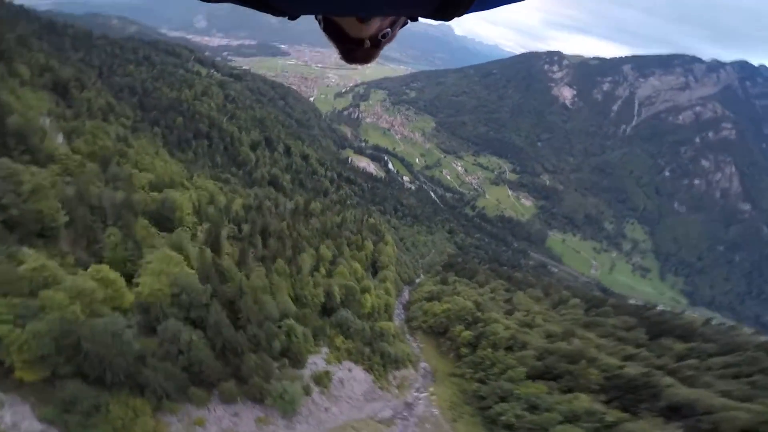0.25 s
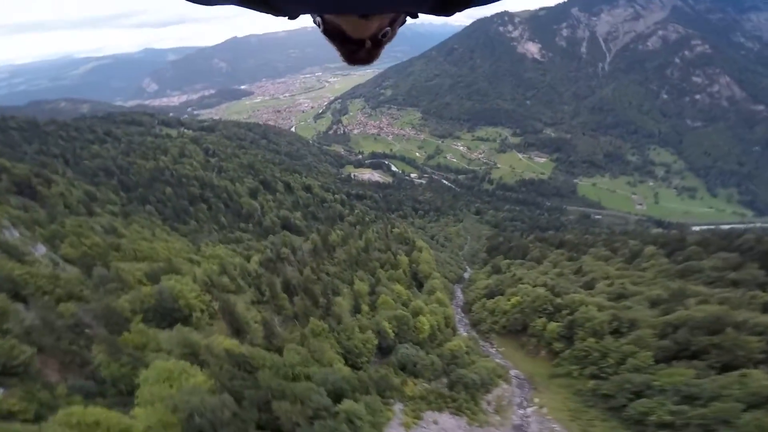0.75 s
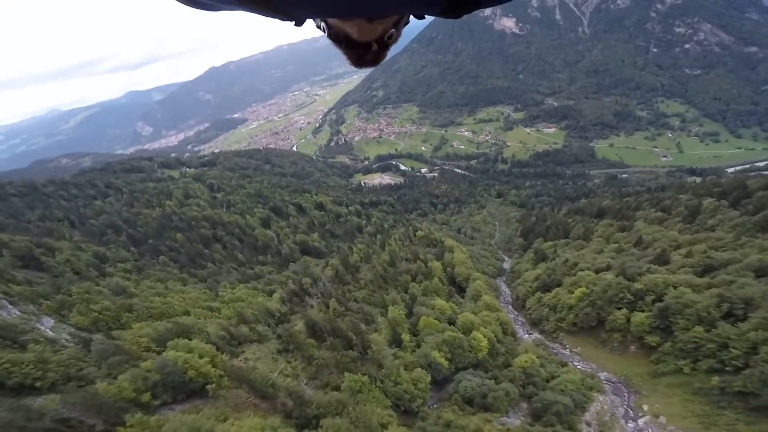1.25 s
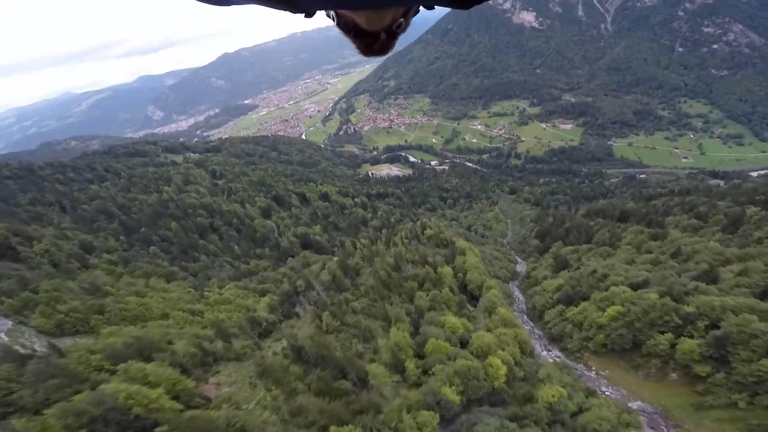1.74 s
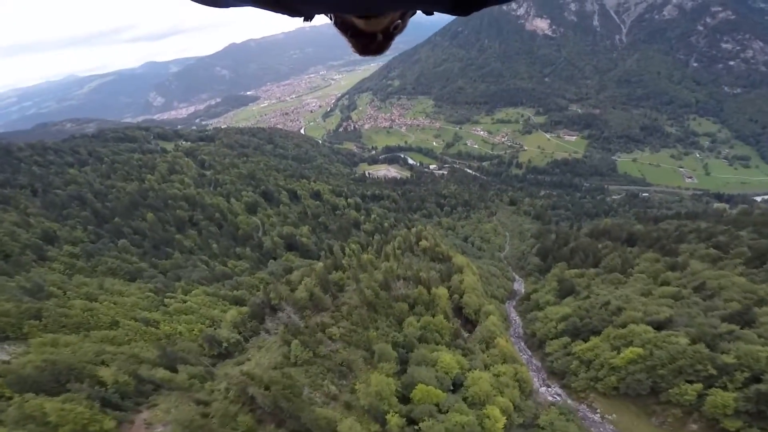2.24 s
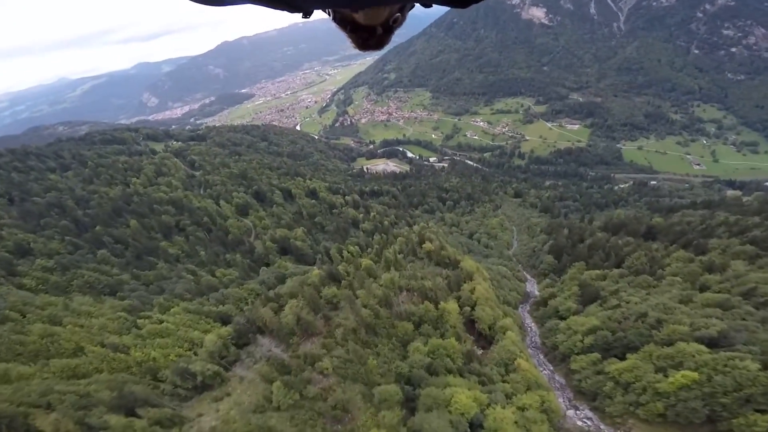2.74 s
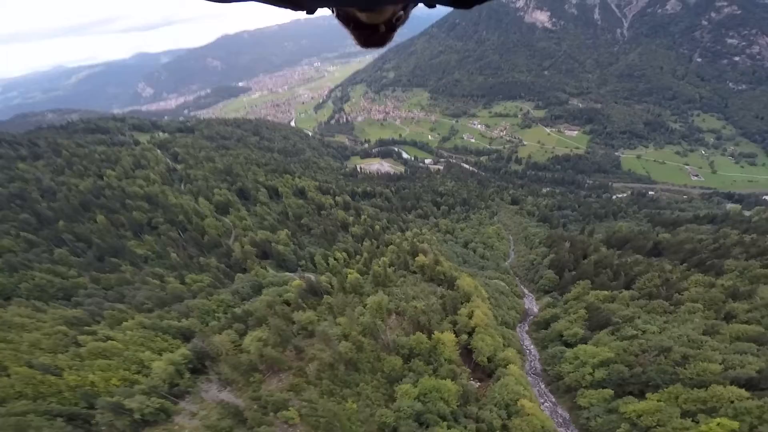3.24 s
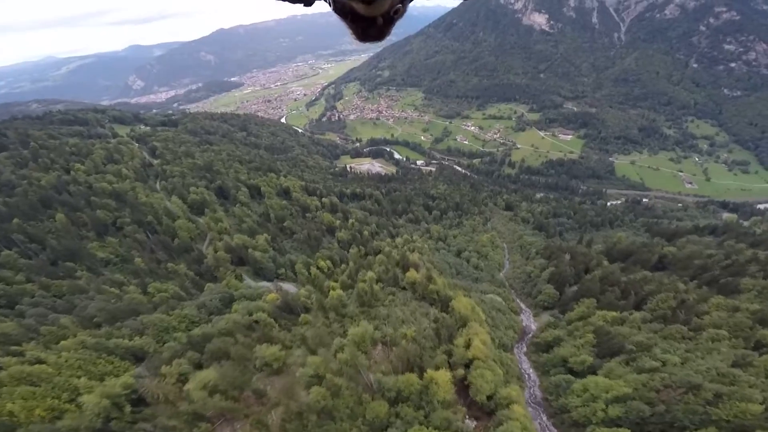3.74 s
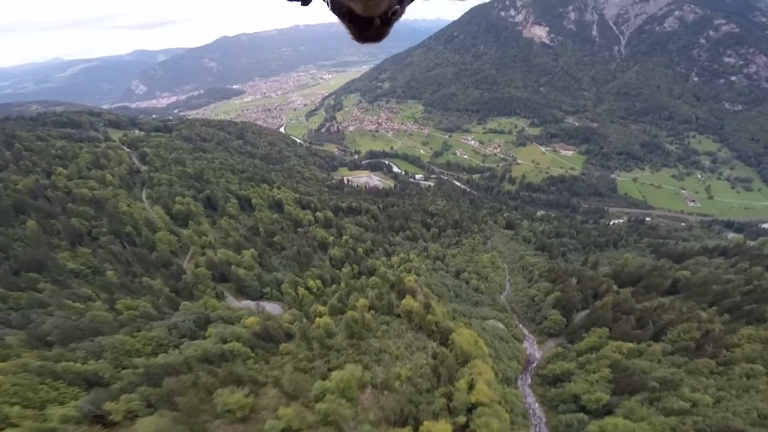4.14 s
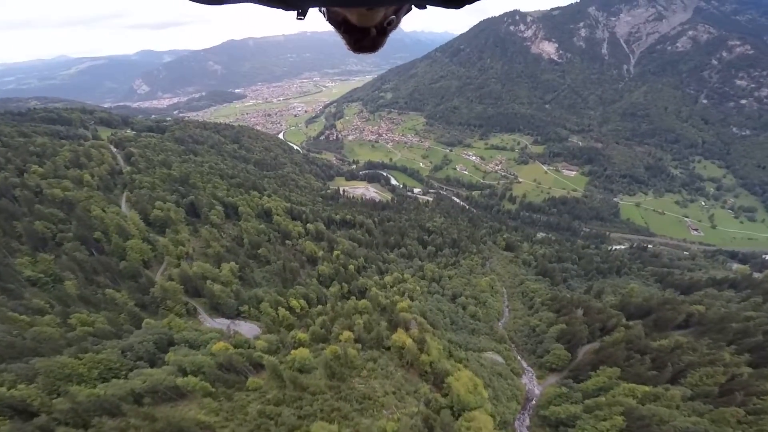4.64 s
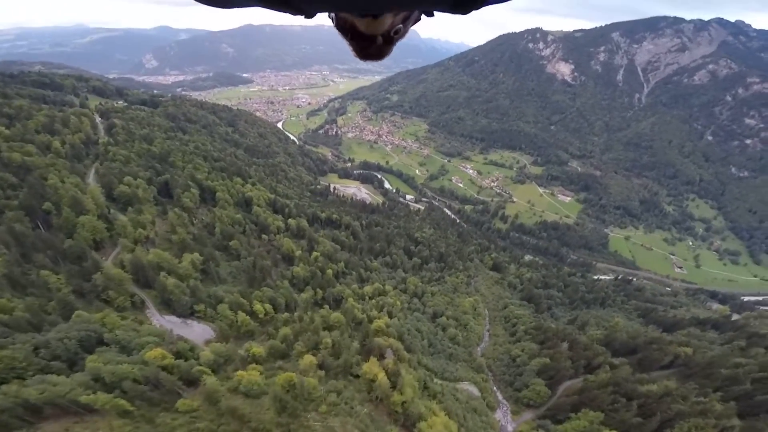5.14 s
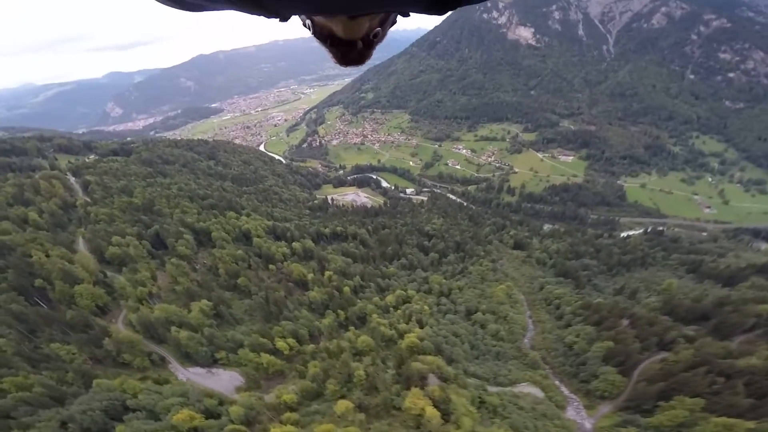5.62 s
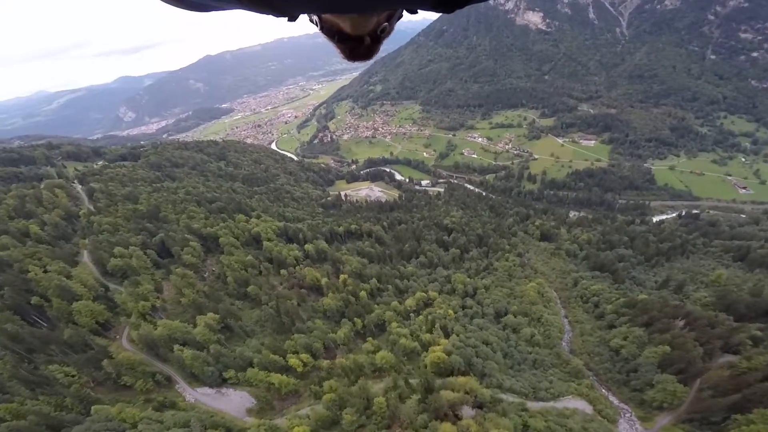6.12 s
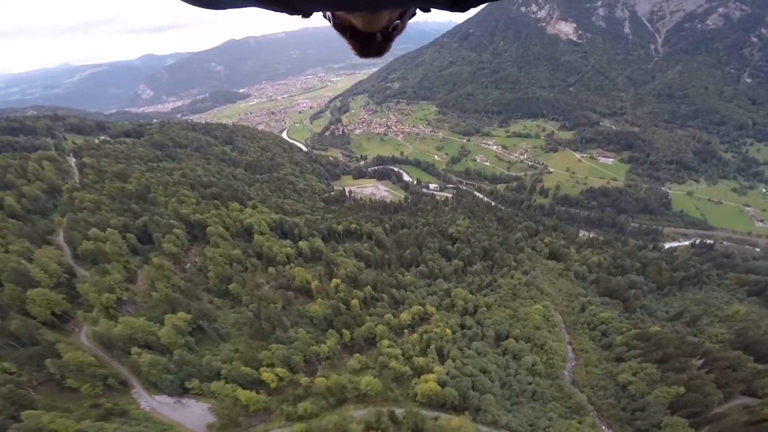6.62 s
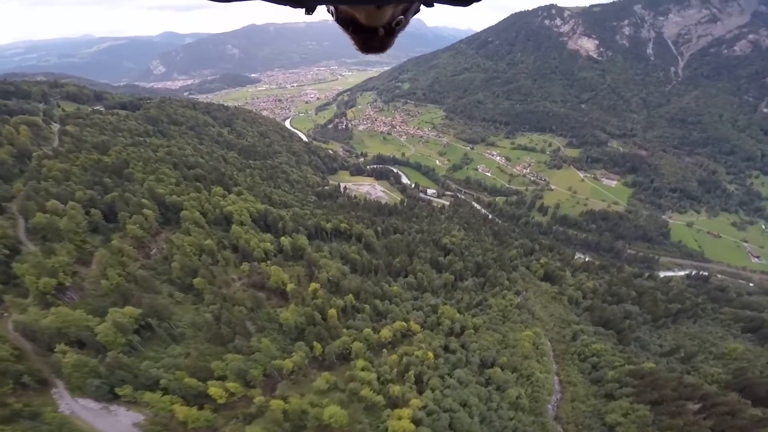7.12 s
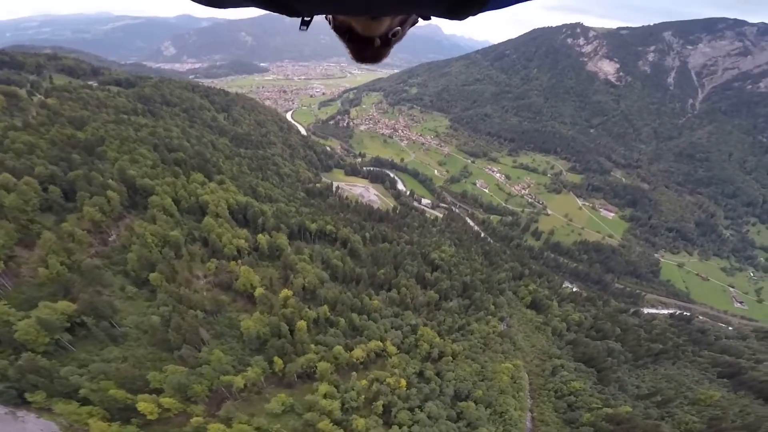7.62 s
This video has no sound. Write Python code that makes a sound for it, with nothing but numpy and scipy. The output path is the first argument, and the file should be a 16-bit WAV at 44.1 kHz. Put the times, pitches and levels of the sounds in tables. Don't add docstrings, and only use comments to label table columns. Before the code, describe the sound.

Wind noise fills the whole eight seconds, already loud at the first instant, as air tears past a small microphone on a helmet in fast flight. The foundation is deep, ragged buffeting, a fluttering low rumble pushing the microphone bodily, with a rough, wavering low drone of vortices from the housing edge. Over it runs a coarse airy rush and a thinner bright hiss that puffs and crackles. The first 0.3 seconds are gusty and spitting; around 1 second the edge rumble thickens. From 2 to 4.8 seconds the flow wavers moderately, dipping near 3, with scattered dull slaps and dry ticks. A stronger gust hits at about 5 to 5.3 with sharper slaps. Fine crackle flares near 6, the wind slackens around 6.5, then strengthens toward the end, cut off still blowing. Everything is mono, very close, dry and compressed, its extreme treble dulled.

```python
import sys
import numpy as np
from scipy import signal
from scipy.fft import rfft, irfft, next_fast_len
from scipy.io import wavfile
from scipy.ndimage import uniform_filter1d

SR = 44100
rng = np.random.default_rng(int(sys.argv[2]) if len(sys.argv) > 2 else 0)


def store_pcm(level_fs):
    pcm = np.round(np.clip(level_fs, -1, 1) * 32767).astype(np.int16)
    wavfile.write(sys.argv[1], SR, np.atleast_2d(pcm).T)


def convert_level_to_amplitude(level_db):
    exponent = np.asarray(level_db, float) / 20
    return 10 ** exponent


N = 347067

# frequency_hz, density_db (per Hz)
BUFFET_SPECTRUM = [(8.8, -45.5), (15, -12.5), (75, 1), (119, 0.5), (150, -3.5), (200, -24.5), (330, -120)]
# frequency_hz, density_db (per Hz)
SHEDDING_SPECTRUM = [(82, -28), (140, -2), (211, -2.5), (400, -19), (520, -45.5), (880, -120)]
# frequency_hz, density_db (per Hz)
RUSH_SPECTRUM = [(180, -22.5), (300, 1.5), (543, -5), (1620, -16.5), (3110, -33), (3600, -37), (4680, -40),
                 (7920, -120)]
# frequency_hz, density_db (per Hz)
PORT_SPECTRUM = [(1820, -23.5), (3100, -41.5), (3580, -9), (4700, 1), (5230, 1.5), (6860, -6.5),
                 (9600, -20.5), (11100, -27), (14400, -55), (22000, -120)]
# time_s, rate_hz
WAKE_RATE = [(0, 77.8), (.3, 82.13), (.75, 121), (1.2, 76.5), (1.5, 99.8), (2.3, 80), (2.85, 120.4),
             (3.2, 87.75), (3.9, 79.9), (4.2, 105), (4.7, 85), (5.0, 110.8), (5.4, 79.7), (5.7, 122.3),
             (5.9, 86.2), (6.9, 92.06), (7.1, 122.6), (7.87, 124)]
# time_s, level_db (re mean)
GUST = [(0, 3), (.26, 1), (.3, 1.8), (.55, 0.3), (.8, 0.5), (2.0, -1), (2.45, 0.6), (3.0, -1.5), (3.4, 0.9),
        (4.2, 0.5), (4.9, 1.2), (5.2, 5), (5.6, -0.7), (6.1, -1.4), (6.45, -3), (6.7, 0.1), (7.25, -0.7),
        (7.87, 3)]
# time_s, level_db (re mean)
YAW = [(0, -4), (.25, 1.5), (.6, -2.7), (1.0, 7), (1.25, 0.1), (1.4, 4), (2.0, 0.2), (2.7, 1.1), (2.95, -6),
       (3.5, -0.5), (4.8, -3), (5.2, 3.5), (5.6, 4), (6.1, 3), (6.45, -2.5), (6.85, 1), (7.2, -6),
       (7.87, 3.5)]
# centre_s, strength_db
FLURRIES = [(.04, 5.5), (.13, 1), (.22, 4.5), (.45, 2.5), (.72, 2.1), (.95, 2.7), (1.27, 0), (1.5, 0.2),
            (2.13, 3), (2.42, 1), (2.72, 2.5), (2.92, 4), (3.2, 2), (3.43, 2), (3.68, 0.5), (3.86, 2),
            (4.15, 1.5), (4.5, 1), (4.78, 1.7), (5.1, 1.5), (5.45, 0.5), (5.65, 3.5), (5.84, 3.5),
            (6.1, 4.5), (6.33, 3.5), (6.7, 0), (6.87, -2), (7.1, -0.2), (7.4, -0.5), (7.72, 0)]
# start_s, level_db, treble_db (re level)
SPITS = [(0.026, -22, -15), (0.0832, -23, -14), (0.1725, -18, -14), (0.196, -15, -14), (0.261, -15, -15),
         (1.0174, -18.5, -14.5), (1.2316, -19.5, -12), (1.2935, -16.5, -14), (2.1306, -20, -13),
         (2.6988, -18.5, -14), (2.7521, -24, -13), (2.805, -21.5, -14), (2.8838, -24, -14),
         (3.2417, -25, -14), (3.4067, -22, -14), (3.6023, -20, -14), (3.6897, -20.5, -14),
         (3.9015, -21, -15), (4.13, -22, -14), (5.089, -15, -14), (5.238, -16, -16), (5.8251, -20, -14),
         (5.8384, -18.5, -14), (5.9634, -23.5, -13), (6.102, -15.5, -15), (6.6598, -17.5, -13.5),
         (6.737, -17, -13), (6.8194, -22.5, -14), (6.8633, -21.5, -14), (6.9064, -24, -14)]
# start_s, level_db, treble_db (re level)
SLAPS = [(0.097, -10, -17), (0.13, -16, -15), (0.166, -5.5, -20), (0.256, -5, -21), (0.346, -5, -24),
         (0.86, -3, -15), (1.409, -23, -22), (2.037, -24, -19), (2.425, -6, -8), (2.466, -5, -22),
         (2.943, -9, -20), (3.418, -9, -20), (3.663, -15, -16), (3.881, -6, -16), (3.953, -6, -21),
         (4.519, -7, -17), (4.726, -3.5, -15), (4.766, -10, -16), (4.937, -23, -22), (5.028, -2, -25),
         (5.177, -4, -8), (5.26, -7, -6), (5.482, -12, -13), (6.075, -17, -14), (6.22, -7.5, -16),
         (6.939, -19, -18), (7.013, -20, -18), (7.082, -5, -24), (7.584, -6, -12), (7.721, -7, -19)]
# mean_db, spread_db, treble_db (re level), treble_spread_db
STRAY_SPITS = (-31, 1.6, -11.5, 2.5)
STRAY_SLAPS = (-21.5, 3.5, -12, 2.5)

HISS_DB = -38.5
RISE_S = 0.001222


def rms_one(x):
    return x / np.sqrt(np.mean(x ** 2) + 1e-20)


def in_time(rows):
    time_s, value = np.transpose(rows)
    return np.interp(np.arange(N) / SR, time_s, value)


def drift(rate_hz):
    r = np.exp(-2 * np.pi * rate_hz / SR)
    noise = rng.standard_normal(N + SR)
    return rms_one(signal.lfilter([1], [1, -2 * r, r * r], noise)[SR:])


def flicker(depth_db, rate_hz):
    return rms_one(convert_level_to_amplitude(depth_db * drift(rate_hz)))


def low_pass(x, order, cutoff_hz):
    return signal.sosfilt(signal.butter(order, cutoff_hz, fs=SR, output="sos"), x)


def sharper(x, share):
    return x - share * np.append(0, x[:-1])


def colour(x, spectrum):
    size = next_fast_len(N + SR // 2) // 2 * 2
    hz, db = np.transpose(spectrum)
    log_hz = np.log(np.maximum(np.fft.rfftfreq(size, 1 / SR), 1))
    gain_db = np.interp(log_hz, np.log(hz), np.maximum(db, -90))
    cepstrum = irfft(np.log(convert_level_to_amplitude(gain_db)), size)
    cepstrum[1:size // 2] *= 2
    cepstrum[size // 2 + 1:] = 0
    response = np.exp(rfft(cepstrum))
    peak = np.abs(irfft(response, size)).max()
    return irfft(rfft(x, size) * response, size)[:N] / peak


def turbulence(spectrum, shared_db, own_db, own_hz):
    lowest_hz, highest_hz = spectrum[1][0], spectrum[-2][0]
    edges_hz = lowest_hz * 2. ** np.arange(1, np.log2(highest_hz / lowest_hz))
    rest, out = rng.standard_normal(N), 0
    for hz in edges_hz:
        octave = signal.sosfiltfilt(signal.butter(2, hz, fs=SR, output="sos"), rest)
        out = out + flicker(own_db, own_hz) * octave
        rest = rest - octave
    out = out + flicker(own_db, own_hz) * rest
    return rms_one(colour(convert_level_to_amplitude(shared_db) * out, spectrum))


def evened(x, share, window_s):
    swell = np.sqrt(uniform_filter1d(x ** 2, round(window_s * SR)) + 1e-3)
    return rms_one(x / swell ** share)


def wake(rate_hz, width_hz):
    phase = 2 * np.pi * np.cumsum(rate_hz) / SR
    return rms_one(drift(width_hz) * np.cos(phase) + drift(width_hz) * np.sin(phase))


def buffet():
    broad = turbulence(BUFFET_SPECTRUM, 0, own_db=-2.0, own_hz=10)
    periodic = convert_level_to_amplitude(-4.5) * wake(in_time(WAKE_RATE), width_hz=23.0)
    return evened(broad + periodic, share=0.53, window_s=.05)


def edge_vortices(eddies):
    noise = turbulence(SHEDDING_SPECTRUM, 2.9 * eddies, own_db=0.8, own_hz=40)
    return evened(noise, share=0.21, window_s=0.13)


def grains(per_s, spread_db):
    sizes = convert_level_to_amplitude(spread_db * np.minimum(rng.exponential(1, N), 4)) * rng.choice([-1, 1], N)
    return rms_one(sizes * (rng.random(N) < per_s / SR))


def rush(level_db, stir_db):
    noise = turbulence(RUSH_SPECTRUM, stir_db + 2.43 * drift(270), own_db=1.92, own_hz=160)
    steps = rms_one(sharper(colour(grains(900, spread_db=2.5), RUSH_SPECTRUM), 0.9))
    return convert_level_to_amplitude(level_db) * rms_one(noise + convert_level_to_amplitude(-10.5) * steps)


def flurries():
    half_width_s = 0.076
    t = np.arange(0, N + 64, 64) / SR
    db = sum(strength_db * np.exp(-((t - s) / half_width_s) ** 2) for s, strength_db in FLURRIES)
    return np.interp(np.arange(N) / SR, t, db - db.mean())


def strays(count, law, swing_db):
    mean_db, spread_db, treble_db, treble_spread_db = law
    start_s = rng.uniform(0, (N - 1) / SR, count)
    size = rng.standard_normal((2, count))
    level_db = mean_db + spread_db * size[0] + swing_db[(start_s * SR).astype(int)]
    return np.transpose([start_s, level_db, treble_db + treble_spread_db * size[1]])


def bursts(events, spectrum, low_hz, split_hz, length_ms):
    start_s, level_db, treble_db = np.transpose(events)
    t = np.arange(-256, 256) / SR
    bell = np.exp(-(2000 * t / length_ms) ** 2)
    puffs = rfft(rng.standard_normal((len(start_s), len(t))) * bell)
    hz = np.maximum(np.fft.rfftfreq(len(t), 1 / SR), 1)
    spectrum_hz, spectrum_db = np.transpose(spectrum)
    puffs *= convert_level_to_amplitude(np.interp(np.log(hz), np.log(spectrum_hz), spectrum_db))
    puffs /= 1 + (low_hz / hz) ** 4
    upper = 1 / (1 + (split_hz / hz) ** 8)
    first = ((start_s + RISE_S) * SR).astype(int).clip(0, N - 1)
    where = first[:, None] + np.arange(len(t))
    out = np.zeros(N + len(t))
    for part, db in ((1 - upper, level_db), (upper, level_db + treble_db)):
        waves = irfft(puffs * part)
        waves *= (convert_level_to_amplitude(db) / np.abs(waves).max(axis=1))[:, None]
        np.add.at(out, where, waves)
    return out[len(t) // 2:][:N]


def port(level_db, stir_db, crackle_db):
    puffing_db = stir_db + 0.43 * drift(30) + 2.0 * drift(420)
    hiss = turbulence(PORT_SPECTRUM, puffing_db, own_db=0.5, own_hz=90)
    fine = strays(count=800, law=STRAY_SPITS, swing_db=level_db - HISS_DB + crackle_db)
    spits = bursts(fine, PORT_SPECTRUM, low_hz=4430, split_hz=6760, length_ms=0.75)
    spits += convert_level_to_amplitude(-2.5) * bursts(SPITS, PORT_SPECTRUM, low_hz=4460, split_hz=7000, length_ms=1.4)
    return convert_level_to_amplitude(level_db - 1.95) * hiss + low_pass(spits, 6, 10400)


def slaps(gust_db):
    weaker = strays(count=40, law=STRAY_SLAPS, swing_db=gust_db)
    stray = bursts(weaker, RUSH_SPECTRUM, low_hz=606, split_hz=2700, length_ms=0.86)
    strong = bursts(SLAPS, RUSH_SPECTRUM, low_hz=560, split_hz=2000, length_ms=0.7)
    return convert_level_to_amplitude(-4.5) * strong + stray


def scene():
    gust_db, yaw_db, flurry_db = in_time(GUST), in_time(YAW), flurries()
    swell_db = 0.16 * drift(6.3)
    eddies = drift(71)

    wake_db = -11.5 + 0.25 * gust_db
    edge_db = -16 + yaw_db + .1 * gust_db + 0.85 * swell_db + 0.66 * flurry_db
    lows = convert_level_to_amplitude(wake_db) * buffet() + convert_level_to_amplitude(edge_db) * edge_vortices(eddies)

    stir_db = 1.25 * eddies + 2.7 * np.maximum(lows, 0)
    rush_db = -23 + gust_db + 0.11 * yaw_db + swell_db + .6 * flurry_db
    port_db = HISS_DB + .6 * gust_db + .05 * yaw_db + 0.32 * swell_db + 0.66 * flurry_db
    crackle_db = .8 * flurry_db + 0.54 * yaw_db
    highs = rush(rush_db, stir_db) + port(port_db, stir_db, crackle_db) + slaps(gust_db)
    return (lows + convert_level_to_amplitude(1.25) * highs)[None]


def limiter(x):
    threshold_db, release_db_per_s, attack_s = -5, 298.5, 0.0037
    ramp = release_db_per_s * np.arange(N) / SR
    over_db = np.maximum(20 * np.log10(np.abs(x) + 1e-9) - threshold_db, 0)
    held_db = np.maximum.accumulate(over_db + ramp, axis=1) - ramp
    width = max(round(attack_s * SR), 1)
    smooth_db = uniform_filter1d(uniform_filter1d(held_db, width), width)
    return x * convert_level_to_amplitude(-.4 * smooth_db)


def self_noise(dry):
    band = signal.butter(2, (9000, 14000), "band", fs=SR, output="sos")
    hiss = signal.sosfilt(band, rng.standard_normal(N))
    busy_db = 10 * np.log10(uniform_filter1d(sharper(dry[0], .98) ** 2, round(.2 * SR)))
    return convert_level_to_amplitude(-71 - .8 * (busy_db - busy_db.mean()) + 3.5 * drift(14)) * hiss


def roll_off(x):
    return signal.sosfilt(signal.butter(12, 14400, fs=SR, output="sos"), x)


def record(dry):
    ceiling = .97
    limited = limiter(dry)
    rounded = limited / (1 + (limited / ceiling) ** 6) ** (1 / 6)
    mix = low_pass(rounded, 4, 11500) + self_noise(dry)
    return roll_off(mix)


dry = scene()
out = record(dry)
store_pcm(out)
```